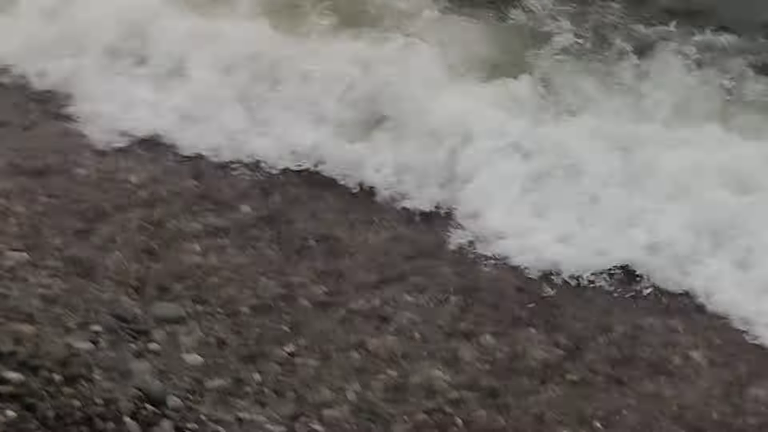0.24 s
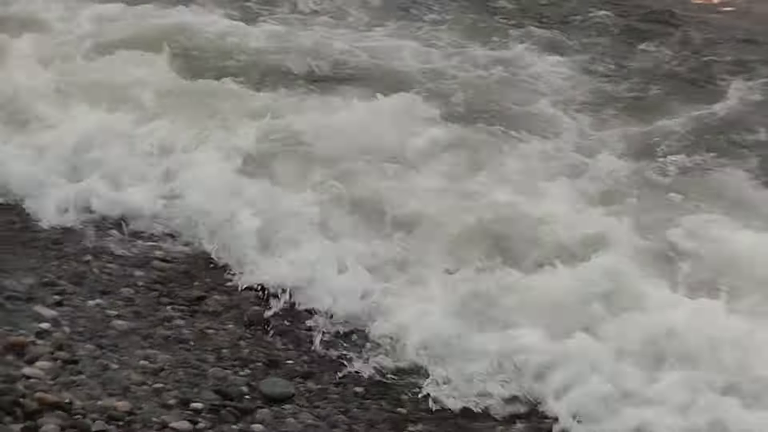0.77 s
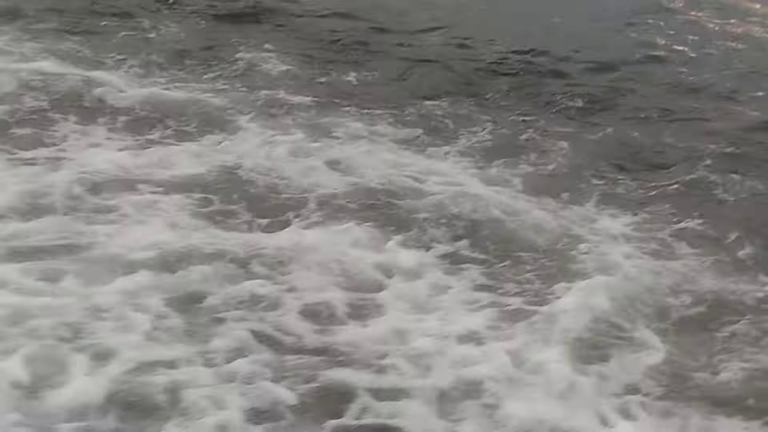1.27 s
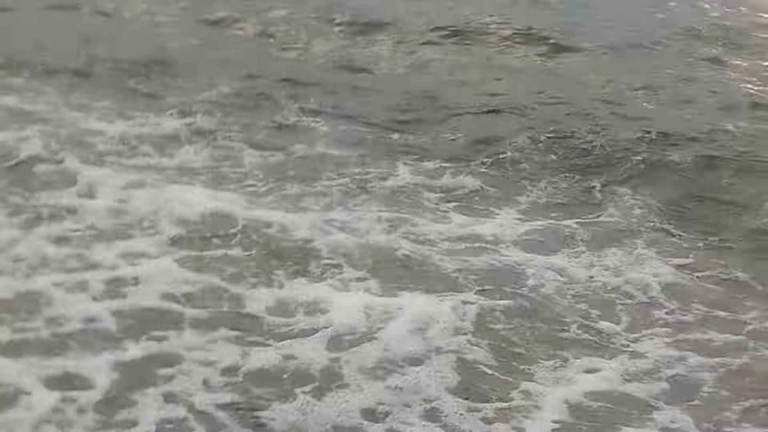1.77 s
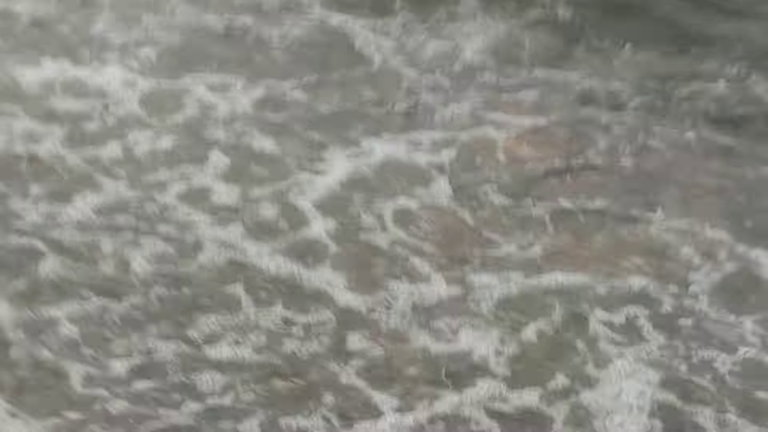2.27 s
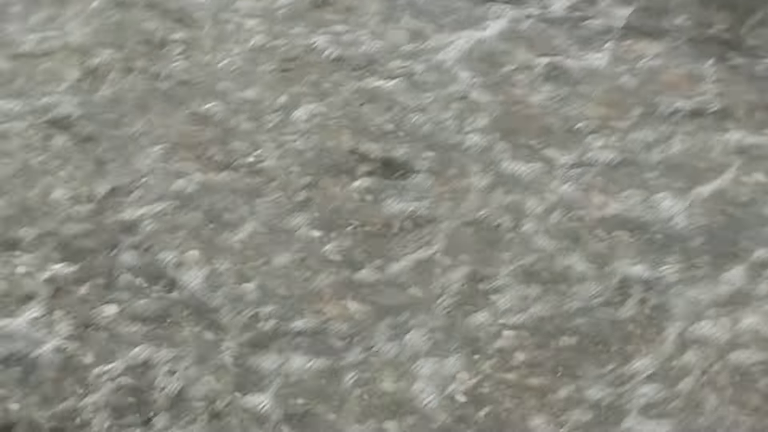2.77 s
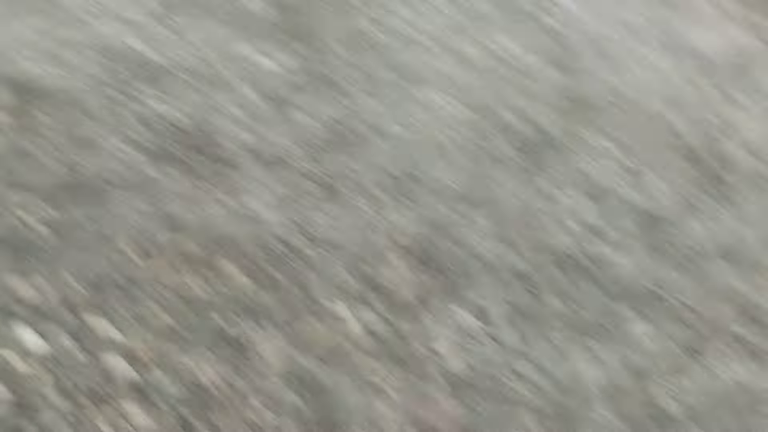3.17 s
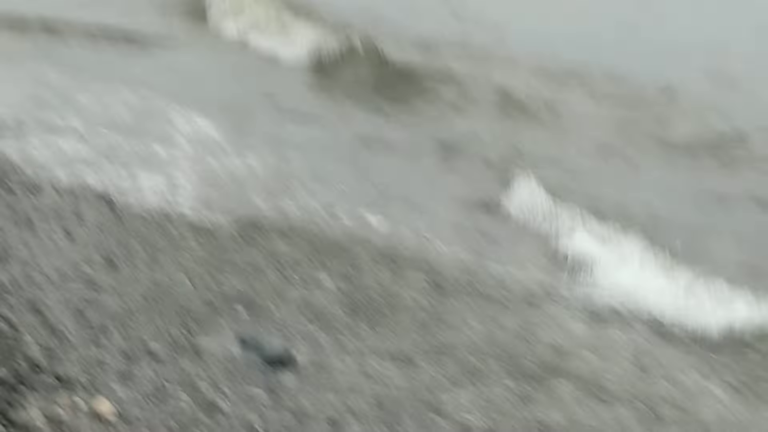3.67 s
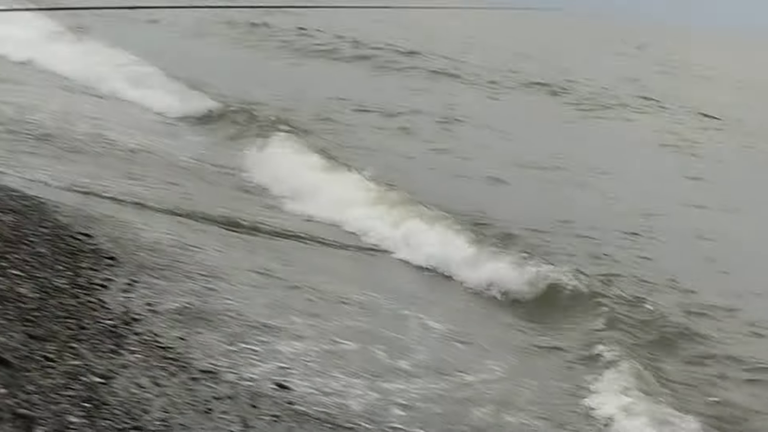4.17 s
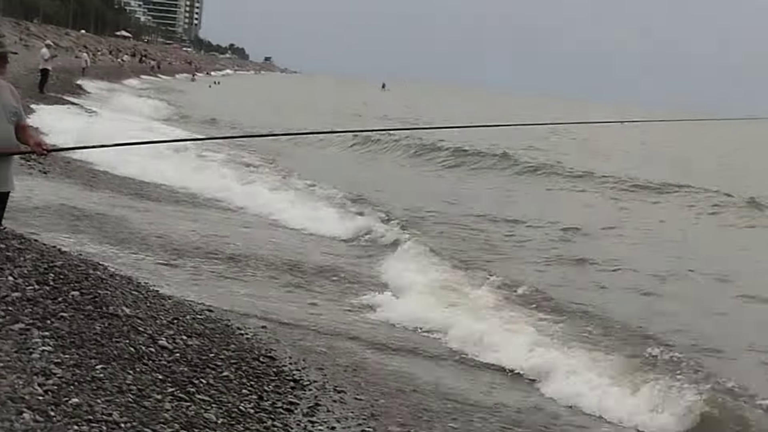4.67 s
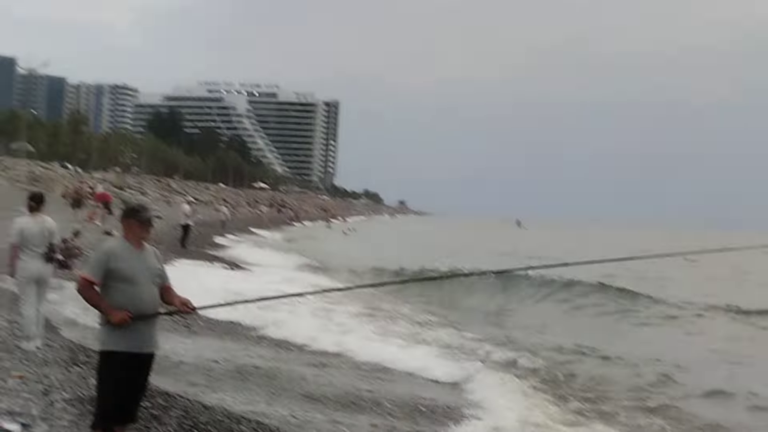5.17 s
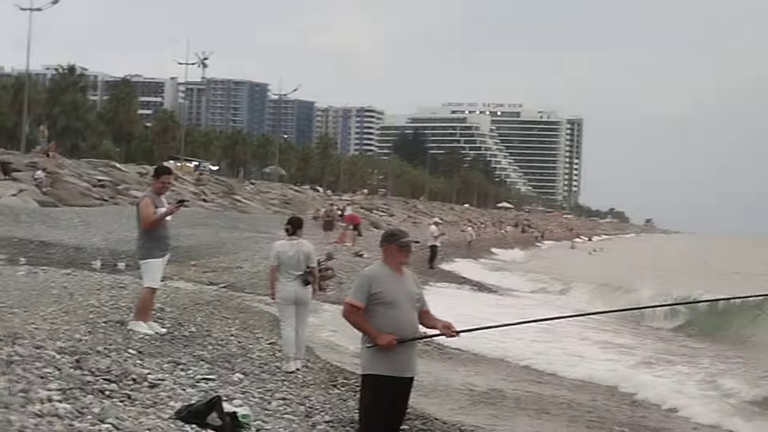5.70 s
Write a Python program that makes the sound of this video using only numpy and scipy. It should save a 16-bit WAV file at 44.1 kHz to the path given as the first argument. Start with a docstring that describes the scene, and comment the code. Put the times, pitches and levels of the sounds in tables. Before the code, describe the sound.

Two rushing surges of surf on shingle, with sharp bursts of knocking pebbles, fizzing foam and light wind buffeting the microphone.

```python
"""Waves break and wash back over a pebble beach, heard through one small hand-held microphone.
At first a surge roars and its foam hisses (shaped noise), while stones clack and crunch (short rings).
The water ebbs over scattered knocks, and wind puffs at the port between about 1 and 2.8 s.
Near 3 s stones burst out knocking, and a second surge swells until about 3.7 s.
It then sinks back, with few knocks left, and the water rises once more at the very end."""
import sys
import numpy as np
from scipy import signal
from scipy.fft import rfft, irfft
from scipy.io import wavfile
from scipy.ndimage import uniform_filter1d

SR = 44100
rng = np.random.default_rng(int(sys.argv[2]) if len(sys.argv) > 2 else 0)


def makeup_ratio(level_db):
    """Linear amplitude ratio for a level in decibels (20 dB per factor of ten)."""
    decades = np.asarray(level_db, float) / 20
    return 10 ** decades


def transcribe(u):
    """Save the signal u as a 16-bit wav file named by the first command-line argument.

    u: samples, shape (n,) or (channels, n), limited to [-1, 1]; the rate is SR.
    q: integer samples, one column per channel.
    """
    v = np.clip(np.atleast_2d(u).T, -1, 1)
    q = np.round(v * 32767).astype(np.int16)
    wavfile.write(sys.argv[1], SR, q)


N = 261954  # length in samples
HZ = np.fft.rfftfreq(1024, 1 / SR)  # pitch of each bin in a short noise frame
FRAME_S = np.arange(N // 256 + 5) * 256 / SR  # time of each noise frame

# How the surges swell. Each row: time in seconds, then levels in dB of the roar, its body,
# its upper edge and the foam's hiss. Body and upper edge count only by how they stray from the roar.
SURGE_LEVELS = [(0, -24.5, -26.5, -24.5, -24.5), (.16, -27, -30, -26.5, -27),
                (.27, -25.5, -27.5, -24.5, -25.5), (.48, -22.5, -24.5, -26.5, -28),
                (.68, -27, -29, -29, -31), (.88, -27.5, -31, -29, -32.5), (1.3, -30, -34, -30, -35),
                (1.65, -30, -39, -31, -35.5), (2.05, -32, -39.5, -36, -39.5), (2.6, -34, -41, -36.5, -37.5),
                (2.9, -37, -42, -38.5, -35), (3.1, -31.5, -35.5, -32.5, -29.5),
                (3.35, -27.5, -28, -26, -25.5), (3.7, -22, -22.5, -23.5, -23),
                (4.13, -24.5, -27.5, -22.5, -25.5), (4.5, -28, -33, -27.5, -29.5),
                (4.93, -30, -38, -29.5, -36.5), (5.44, -37.5, -42.5, -37, -39), (5.7, -34, -44, -33.5, -36),
                (5.94, -26, -29.5, -26.5, -28)]
# Swell of the deep boom under the roar. Each row: time in seconds, level in dB (only its changes count).
BOOM_LEVELS = [(0.0, -32), (0.08, -26.5), (0.18, -32.5), (0.25, -27), (0.71, -36), (2.07, -44.5),
               (2.63, -36.5), (2.84, -41), (3.72, -30), (5.29, -44), (5.94, -35)]
# Colour of the roar. Each row: pitch in Hz, relative strength in dB per Hz.
ROAR_COLOUR = [(41, -44), (70, -8.5), (136, -1), (233, 0), (307, -3.5), (492, -4), (648, -2), (927, 0),
               (1130, -2.5), (1890, -2.5), (2190, -2), (3030, -21.5), (3400, -27), (4420, -33),
               (7480, -120)]
# Colour of the foam's hiss. Each row: pitch in Hz, relative strength in dB per Hz.
HISS_COLOUR = [(1710, -30), (2900, -15.5), (3160, -17), (3940, -5), (4610, -6.5), (5170, -2), (5930, -8.5),
               (6740, -2), (7560, 0.5), (8840, -1), (12900, -11.5), (15100, -15), (16000, -10)]
# Finest spray, at the top of the hiss. Each row: time in seconds, level in dB (only its changes count).
SPRAY_LEVELS = [(0.0, -38), (1.01, -44.5), (2.02, -50), (3.01, -50.5), (3.18, -38.5), (4.02, -37.5),
                (5.01, -50), (5.64, -50), (5.94, -39)]
FIZZ_FOLLOWS = 0.41  # share by which the coarse fizz follows the roar's upper edge, not the hiss

# Crunches of shifting pebbles. Each row: start in seconds, peak level in dB, length in seconds,
# then levels in dB of the fine top and the low body against that peak.
CRUNCHES_HEARD = [(.045, -21.5, .08, -20, -18), (.143, -16, 0.1, -14, -16), (.34, -25, 0.22, -28, -12),
                  (.71, -21, 0.028, -22, -8), (.724, -23, 0.11, -28, -7), (1.485, -29.5, 0.029, -26, -5),
                  (1.562, -29, 0.05, -20, -7), (1.632, -30, .06, -22, -2), (1.697, -30.5, .04, -14, -5),
                  (2.238, -32, 0.19, -17, -6), (2.445, -29.5, 0.055, -17, -8), (2.53, -33, 0.13, -22, -3),
                  (2.8, -39, 0.24, -18, -5), (2.988, -11.5, .06, -17, -14.5), (3.04, -25.5, 0.18, -15, -10),
                  (3.175, -37, 0.035, -6, -9), (3.24, -38, .12, -16, -8)]
# Rise as a share of the length; level in dB at its end; power by which the fade steepens.
CRUNCH_RISE, CRUNCH_FADE_DB, CRUNCH_BEND = 0.087, -14.5, 2.26
# Small clacks within a crunch: how many per second, and their strength over its momentary level.
STRAYS_PER_S, STRAY_DB, STRAY_SPREAD_DB = 150, 5.5, 4.5

# Colour of a clack as the port hears it. Each row: pitch in Hz, relative strength in dB per Hz.
STONE_COLOUR = [(530, -42.5), (900, -17.5), (1620, -20), (1950, -15.5), (2330, -13), (3470, -33),
                (5220, -13.5), (6250, -13.5), (7580, 2), (10600, -9), (11800, -16), (15100, -15),
                (16000, -34)]
# The clear single clacks. Each row: first contact in seconds, peak level in dB, centre in Hz,
# brightness as a tilt in dB per octave.
SINGLE_CLACKS = [(0.0872, -10, 7950, -3), (0.1077, 5, 7600, 0.1), (0.1134, -8, 7270, 10),
                 (0.1296, -6, 8300, 6), (0.1486, 1, 8450, -3), (0.164, -6, 7400, 0.1),
                 (0.1846, -3, 8710, 0.1), (0.3501, -9, 7600, 4), (0.4475, -12, 8000, 0.1),
                 (0.5521, -12, 8340, -2), (0.6065, -8, 8240, -7), (0.714, -4.5, 8840, -15.5),
                 (0.7174, -11, 8480, 5), (0.727, 0, 7700, -2), (0.7464, -12, 7620, -3),
                 (0.7594, -15, 7800, 0.1), (0.822, -13, 7810, -2), (0.833, -15, 8050, 0.1),
                 (1.0415, -19, 8520, -9), (1.1932, -19, 7790, -2), (1.4883, -22, 7190, 0.1),
                 (1.494, -24, 7900, -2), (1.5705, -18, 8040, -3), (1.6347, -19, 7800, 4),
                 (1.638, -19, 7120, 0.1), (1.6494, -18, 7970, 0.1), (1.701, -17, 7500, -4),
                 (1.7078, -14, 7640, 0.1), (1.7844, -25, 7840, 0.1), (1.8644, -26, 7800, 0.1),
                 (2.3206, -18, 7860, 0.1), (2.3436, -19, 8460, 0.1), (2.363, -19.5, 8590, 0.1),
                 (2.3794, -23, 8490, -4), (2.4688, -15, 8440, 3), (2.553, -19, 7760, 0.1),
                 (2.574, -19, 8890, 0.1), (2.598, -18, 8000, 5), (2.6359, -17, 8120, -7),
                 (2.9957, -12, 7900, -6), (3.0026, -2.5, 7820, -3), (3.0083, -5, 7640, 2),
                 (3.0182, -2, 7950, 0.1), (3.0226, -9, 7400, -3), (3.0942, -10, 8400, 0.1),
                 (3.0984, -11, 9010, -1), (3.1263, -8.5, 8800, 2), (3.1394, -19, 7200, -3),
                 (3.1767, -12, 7850, 2.5), (3.1814, -7, 8720, 0.1), (3.2106, -15, 7710, 0.1),
                 (3.248, -12, 8670, 0.1), (3.253, -10, 9010, -5), (3.2999, -16, 8900, -2),
                 (3.3278, -14, 7550, 0.1), (3.4254, -11.5, 7630, 2.5), (3.5893, -7.5, 7550, 7),
                 (3.6237, -9, 7470, 0.1), (3.8654, -11, 7420, 0.1)]
# High, thin ticks of spray or grit. Each row: first contact in seconds, peak level in dB.
THIN_TICKS = [(0.0852, -29), (0.1072, -23), (0.1296, -28), (0.1491, -21), (0.1645, -16), (0.1845, -23),
              (0.2189, -22), (0.386, -30), (2.9951, -21), (3.0021, -15), (3.0674, -27), (3.0889, -22),
              (3.1138, -23), (3.1268, -19), (3.1542, -31), (3.1642, -20), (3.1762, -14), (3.2101, -23),
              (3.2241, -18), (3.246, -24), (3.2999, -24), (3.3278, -25), (3.3343, -23), (3.3538, -27),
              (3.3737, -26), (3.3967, -31), (3.4121, -28), (3.5284, -22), (3.5668, -12), (3.5887, -23),
              (3.6202, -28), (3.6441, -26), (3.693, -33), (3.7025, -25), (3.8696, -14), (3.9903, -26)]
PEAK_AFTER_S = 0.0014  # a knock peaks this long after first contact

# Steady wind at the port. Each row: time in seconds, level in dB before a 2 dB lift.
WIND_LEVELS = [(0.0, -46), (0.89, -43), (1.44, -45), (2.33, -51), (2.66, -41), (2.79, -48), (3.46, -54),
               (3.89, -42), (4.71, -49), (5.94, -52)]
# Colour of the steady wind. Each row: pitch in Hz, relative strength in dB per Hz.
WIND_COLOUR = [(10, -6), (30, -1), (55, 2.5), (90, -3), (160, -16), (300, -76)]
# Single puffs of wind. Each row: start in seconds, strength of the push in dB,
# pitch in Hz as the rising glide passes half of PUFF_S.
WIND_PUFFS = [(1.026, -27, 49.5), (1.359, -34, 32), (1.469, -35, 26.9), (2.273, -31, 51.1),
              (2.532, -34, 53.3), (2.584, -24, 41), (2.759, -29, 40)]
PUFF_S, PUFF_GLIDE = 0.047, 0.41  # time scale in seconds; pitch glide as a share of the table's pitch


def roar():
    """The breaking water is noise whose boom, body and upper edge each swell by their own amount."""
    level_db, body_db, upper_db, _ = surge()
    boom_db = np.interp(FRAME_S, *np.transpose(BOOM_LEVELS))
    moving_db = level_db + hump(147, 1.23) * against(boom_db, level_db)
    moving_db = moving_db + hump(418, 0.59) * against(body_db, level_db)
    moving_db = moving_db + hump(1770, 0.48) * against(upper_db, level_db)
    splashed = hump(1560, 1.3)  # splashes flicker the upper roar only
    return noise(ROAR_COLOUR, 670, 1100, moving_db, patchy_db=0.73, flicker_db=0.98 * splashed)


def surge():
    """The surge levels at every frame, as the water comes and goes: roar, body, upper edge, hiss."""
    s, *columns = np.transpose(SURGE_LEVELS)
    return [np.interp(FRAME_S, s, column) for column in columns]


def foam():
    """Bursting foam makes a smooth hiss and a thin crackle of single pops."""
    *_, upper_db, level_db = surge()
    spray_db = np.interp(FRAME_S, *np.transpose(SPRAY_LEVELS))
    moving_db = level_db + hump(12400, 0.44) * against(spray_db, level_db)
    moving_db = moving_db + FIZZ_FOLLOWS * hump(4300, 0.53) * against(upper_db, level_db)
    hiss = noise(HISS_COLOUR, 7020, 10030, moving_db, patchy_db=0.5, flicker_db=0.52)
    crackle = grit(900, spread_db=2.5)
    pops = crackle * makeup_ratio(np.interp(np.arange(N) / SR, FRAME_S, level_db))
    return makeup_ratio(1.37) * hiss + makeup_ratio(-12.0) * pops


def crunches():
    """Many pebbles slide at once: dense ticks swell; fine grit adds top, big stones add body."""
    rattle = rfft(grit(3500, spread_db=1.5))
    hz = np.fft.rfftfreq(N, 1 / SR)
    top = 1 / (1 + (11500 / (hz + 1)) ** 16)
    body = 1 / (1 + (hz / 6000) ** 16)
    parts = [evened(irfft(rattle * share, N)) for share in (1 - top - body, top, body)]
    return makeup_ratio(-2.5) * (slides() * parts).sum(0)


def slides():
    """Gains of rattle, top and body: each crunch rises fast, holds a moment and dies away."""
    gains = np.zeros((3, N))
    for s, peak_db, length_s, top_db, body_db in CRUNCHES_HEARD:
        t = np.maximum(np.arange(N) / SR - s, 0)
        rise = 1 - np.exp(-(t / length_s / CRUNCH_RISE) ** 2)
        fade = makeup_ratio(peak_db + CRUNCH_FADE_DB * (t / length_s) ** CRUNCH_BEND)
        gains += makeup_ratio([[0], [top_db], [body_db]]) * rise * fade
    return gains


def clacks():
    """Stones knock together and grind for a few milliseconds; small ones scatter in each crunch."""
    out = np.zeros(N)
    shakes = rng.standard_normal((len(SINGLE_CLACKS), 600))
    for (s, peak_db, hz, tilt_db), shake in zip(SINGLE_CLACKS, shakes):
        touch = contact(shake, 0.00036, 0.0076)
        add(out, s, peak_db, np.convolve(touch, click(tilt_db, hz, purity=1.5)))
    # the small strays, louder where a crunch is louder
    hits = rng.random(N) < STRAYS_PER_S / SR
    sizes = makeup_ratio(STRAY_DB + STRAY_SPREAD_DB * rng.uniform(-1, 1, N))
    train = hits * sizes * slides()[0]
    touches = signal.oaconvolve(train, contact(np.ones(600), 0.0004, 0.0084))[:N]
    scrape = touches * rng.standard_normal(N)
    ring = click(0, purity=1.35)
    return out + signal.oaconvolve(scrape, ring / np.linalg.norm(ring))[:N]


def ticks():
    """Tiny hard ticks are brief scrapes of noise, kept to a band near the top of hearing."""
    out = np.zeros(N)
    band = signal.butter(2, [13200, 15700], "bandpass", fs=SR, output="sos")
    for (s, peak_db), shake in zip(THIN_TICKS, rng.standard_normal((len(THIN_TICKS), 400))):
        add(out, s, peak_db, signal.sosfilt(band, contact(shake, 0.0003, 0.010)))
    return out


def wind():
    """Air makes lumpy low pressure at the microphone port, with a few single puffs."""
    level_db = np.interp(np.arange(N) / SR, *np.transpose(WIND_LEVELS))
    colour = makeup_ratio(read(WIND_COLOUR, np.fft.rfftfreq(N, 1 / SR)))
    lumps = evened(irfft(rfft(rng.standard_normal(N)) * colour, N))
    out = lumps * makeup_ratio(2.0 + level_db)
    b, a = signal.butter(2, [60, 190], "bandpass", fs=SR)
    flutter = evened(signal.lfilter(b, a, rng.standard_normal(N)))
    t = np.arange(0, 2 * PUFF_S, 1 / SR)
    push = (t / PUFF_S) ** 2 * np.exp(-4.5 * t / PUFF_S)
    push /= push.max()
    for s, strength_db, hz in WIND_PUFFS:
        swing = np.sin(2 * np.pi * hz * t * (1 + PUFF_GLIDE * (t / PUFF_S - 1)))
        place = slice(round(s * SR), round(s * SR) + len(t))
        out[place] += makeup_ratio(strength_db) * push * (0.93 * swing + 0.33 * flutter[place])
    return out


def noise(spectrum, lo_hz, hi_hz, moving_db, patchy_db, flicker_db):
    """Random short-time spectra, rms 1 from lo to hi at 0 dB, with drifting patches and shared flicker."""
    a, b, patches = rng.standard_normal((len(FRAME_S), len(HZ), 3)).T
    patches = evened(uniform_filter1d(uniform_filter1d(patches, size=12, axis=0), size=10, axis=1))
    flicker = evened(uniform_filter1d(rng.standard_normal(len(FRAME_S)), size=5))
    shape = makeup_ratio(read(spectrum, HZ))
    in_band = (HZ > lo_hz) & (HZ < hi_hz)
    shape /= np.sqrt(np.sum(shape[in_band] ** 2) * 1536)
    gain_db = moving_db + patchy_db * patches + flicker_db * flicker
    z = (a + 1j * b) * shape[:, None] * makeup_ratio(gain_db)
    return 32 * signal.istft(z, nperseg=1024, noverlap=768)[1][:N]


def grit(per_s, spread_db):
    """A random train of stone-like ticks, a few of them large, in three shades; rms 1."""
    chance, size, shade = rng.random(N), rng.exponential(1, N), rng.integers(0, 3, N)
    train = (chance < per_s / SR) * makeup_ratio(spread_db * np.minimum(size, 4)) * rng.choice([-1, 1], N)
    out = np.zeros(N)
    for k, tilt_db in enumerate((-4, 0, 5)):
        out += signal.oaconvolve(train * (shade == k), click(tilt_db))[:N]
    return evened(out)


def click(tilt_db, hz=8000, purity=1):
    """The ring of one stone contact, its colour slid to hz; purity deepens the resonance; peak 1."""
    tilt = tilt_db * np.log2(np.maximum(HZ, 5000) / 8000)
    colour_db = purity * read(STONE_COLOUR, HZ * 8000 / hz) + tilt
    log_gain = np.log(makeup_ratio(np.maximum(colour_db, -100)))
    circle = np.r_[log_gain, log_gain[-2:0:-1]]
    # minimum phase: the ring starts at the contact, never before it
    ring = np.fft.ifft(np.exp(np.conj(signal.hilbert(circle)))).real[:256]
    return ring / abs(ring).max()


def contact(shake, rise_s, t60):
    """A scraping touch: the given signal swells for a moment and falls 60 dB in t60 seconds."""
    t = np.arange(len(shake)) / SR
    return shake * (1 - np.exp(-(t / rise_s) ** 2)) * makeup_ratio(-60 * t / t60)


def add(mix, s, peak_db, sound):
    """Mixes a short knock in so that its peak falls just after s."""
    top = abs(sound).argmax()
    start = round((s + PEAK_AFTER_S) * SR) - top
    mix[start:][:len(sound)] += makeup_ratio(peak_db) * sound / abs(sound[top])


def hump(hz, octaves):
    """A bell over log frequency: the share of each bin that a control reaches."""
    return np.exp(-(np.log2((HZ + 1) / hz) / octaves) ** 4)[:, None]


def against(part_db, level_db):
    """How far a part stands above or below its usual place under the main level."""
    return part_db - level_db - np.mean(part_db - level_db)


def read(points, hz):
    """Reads a colour table on a log-frequency axis."""
    f, value = np.transpose(points)
    return np.interp(np.log(hz + 1), np.log(f + 1), value)


def evened(x):
    """Scales to rms 1."""
    return x / np.sqrt(np.mean(x ** 2) + 1e-20)


def scene():
    """Water, stones and wind meet at one port, which feeds both channels."""
    mono = roar() + foam() + crunches() + clacks() + ticks() + wind()
    return np.array([mono, mono])


def band_limit(x):
    """A steep low-pass at the top of the band."""
    return signal.sosfilt(signal.butter(12, 16380, fs=SR, output="sos"), x)


def record(dry):
    """The hardest clacks overload and flatten at full scale; then the top of the band is cut off."""
    clipped = np.clip(dry, -1, 1)
    edge = signal.firwin(2047, 15775, window=("kaiser", 9), fs=SR)[None]
    mix = signal.oaconvolve(clipped, edge, "same", axes=1)
    return band_limit(mix)


dry = scene()
out = record(dry)
transcribe(out)
```